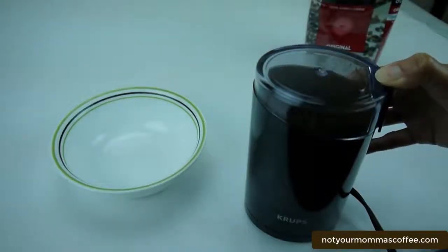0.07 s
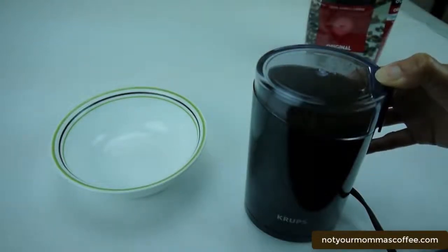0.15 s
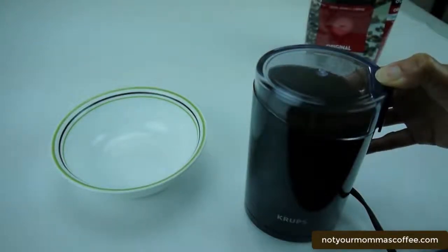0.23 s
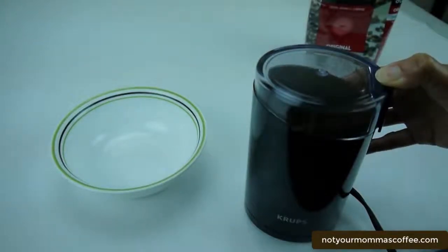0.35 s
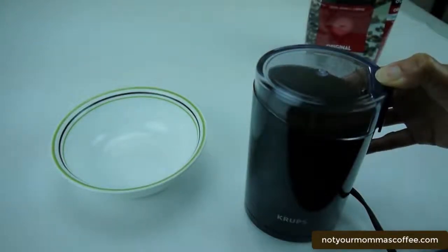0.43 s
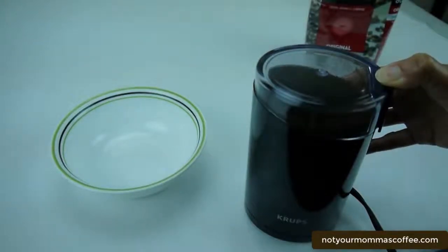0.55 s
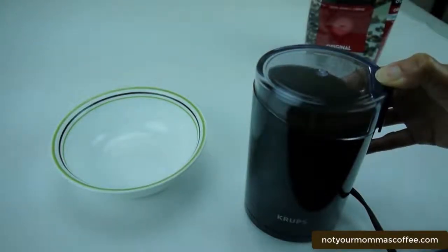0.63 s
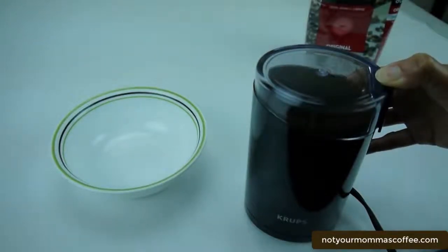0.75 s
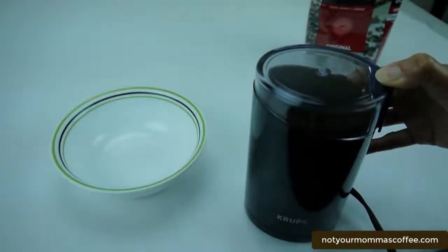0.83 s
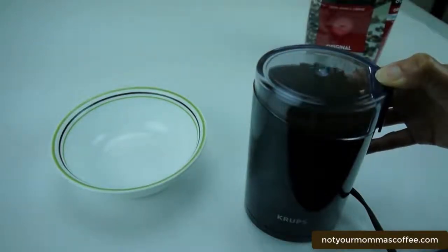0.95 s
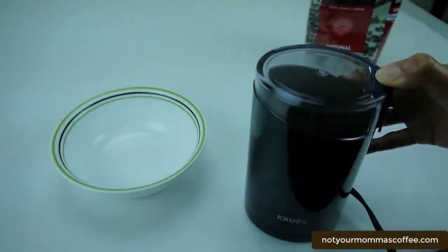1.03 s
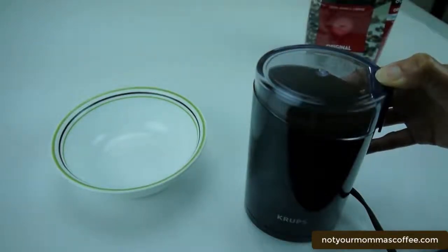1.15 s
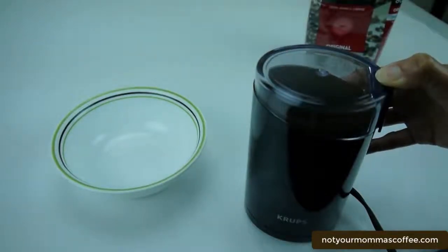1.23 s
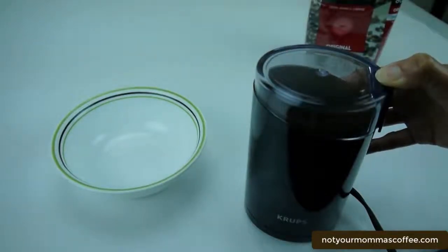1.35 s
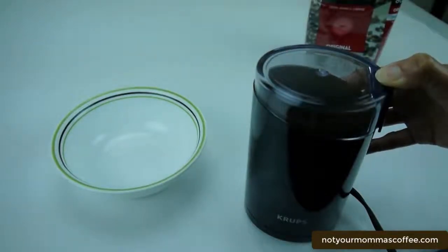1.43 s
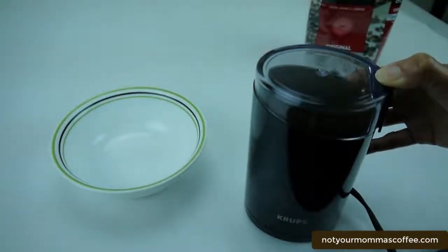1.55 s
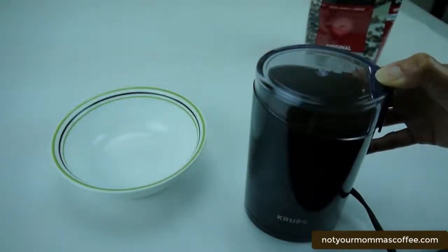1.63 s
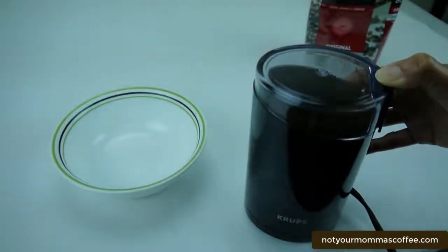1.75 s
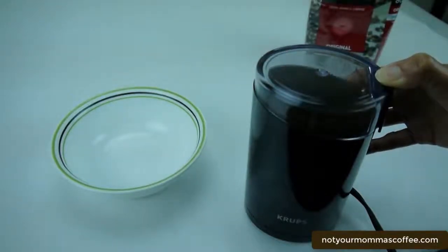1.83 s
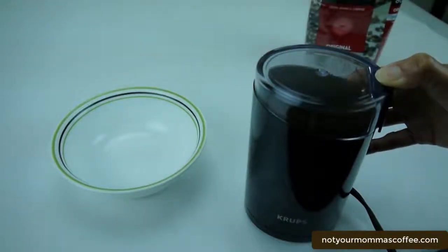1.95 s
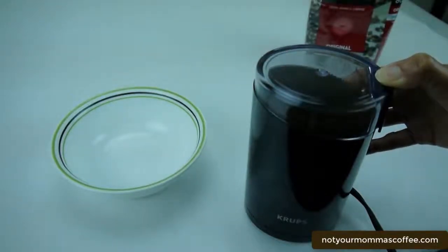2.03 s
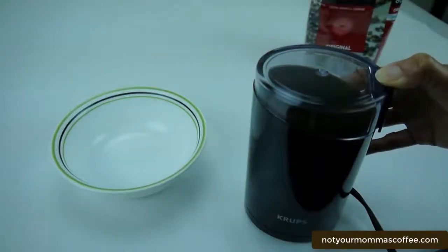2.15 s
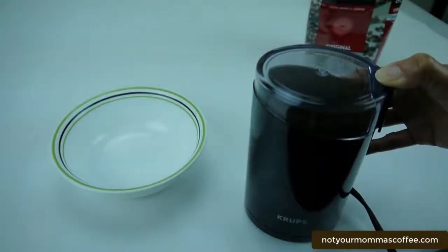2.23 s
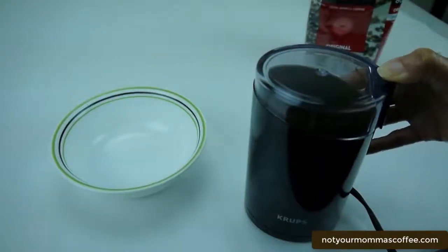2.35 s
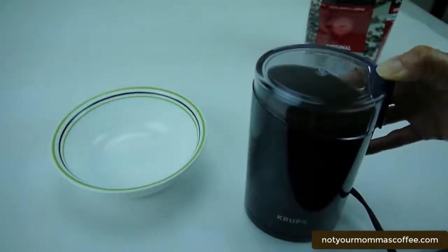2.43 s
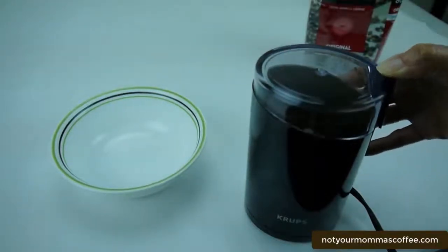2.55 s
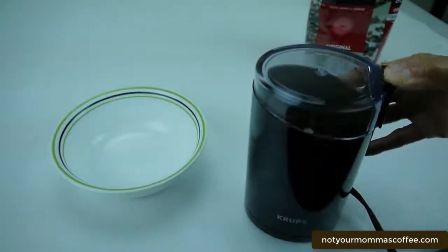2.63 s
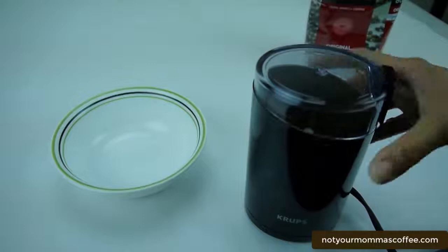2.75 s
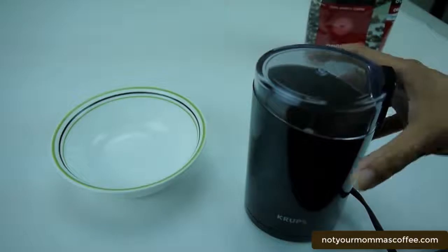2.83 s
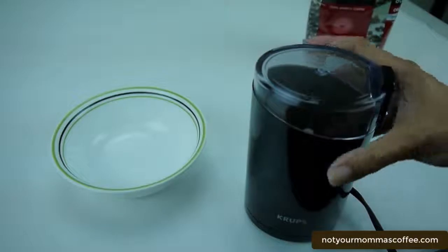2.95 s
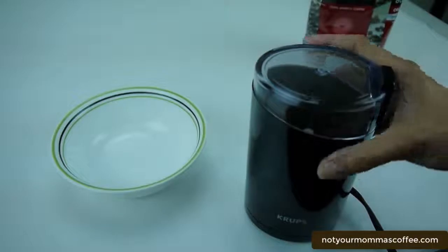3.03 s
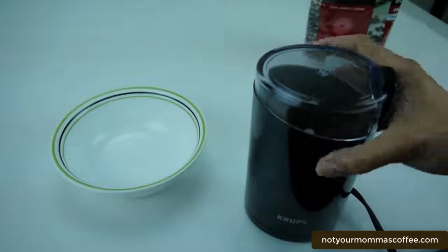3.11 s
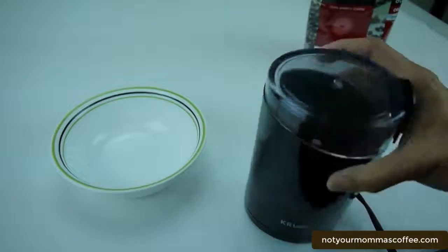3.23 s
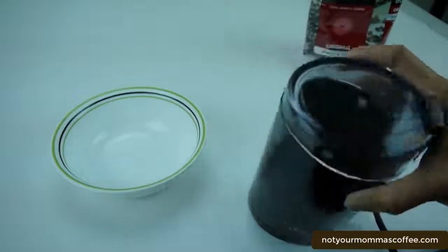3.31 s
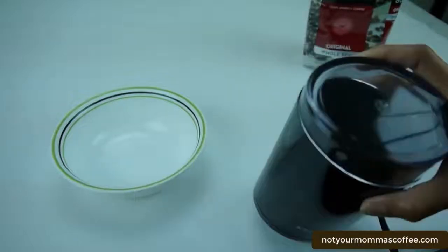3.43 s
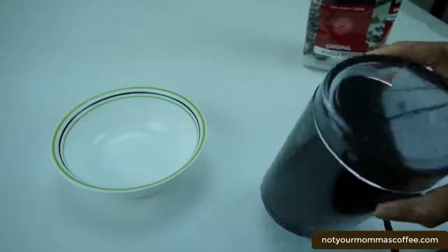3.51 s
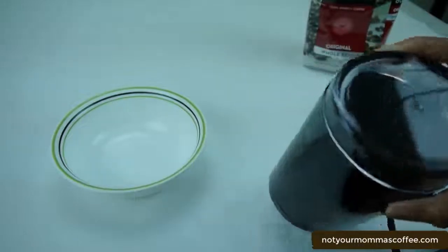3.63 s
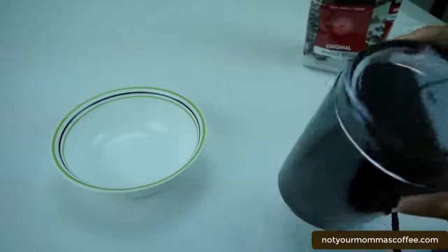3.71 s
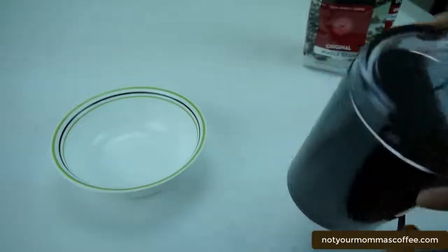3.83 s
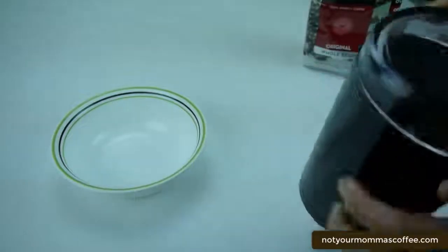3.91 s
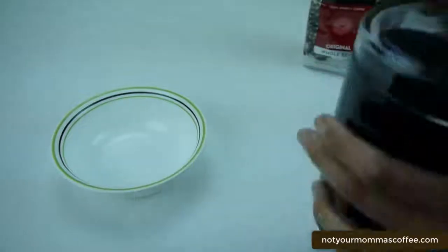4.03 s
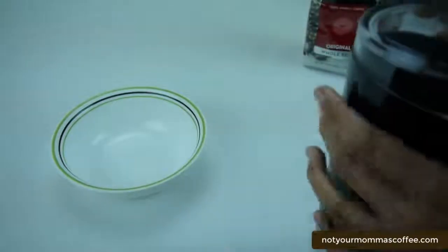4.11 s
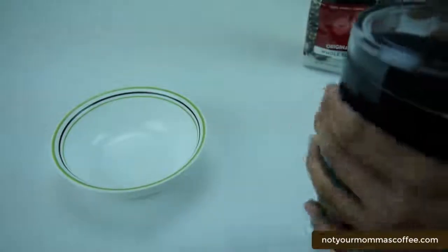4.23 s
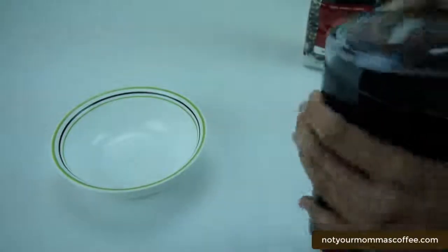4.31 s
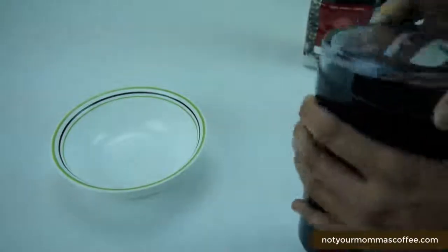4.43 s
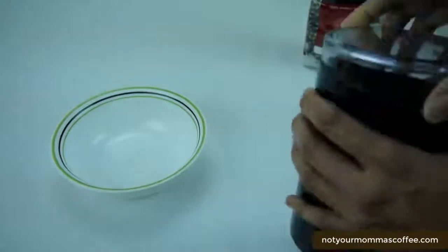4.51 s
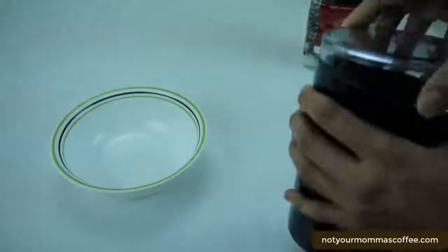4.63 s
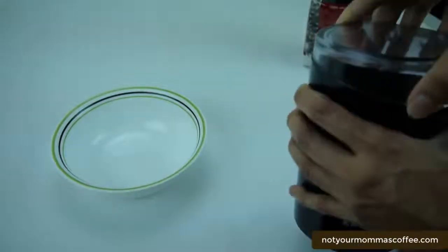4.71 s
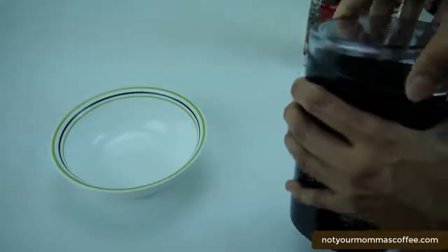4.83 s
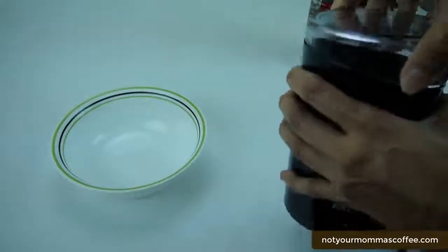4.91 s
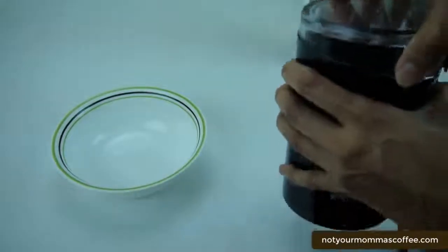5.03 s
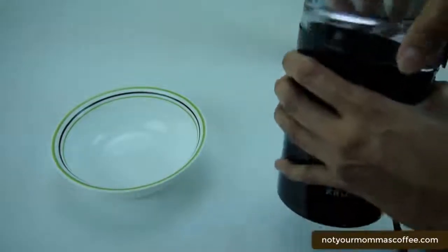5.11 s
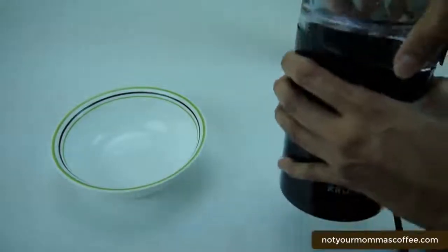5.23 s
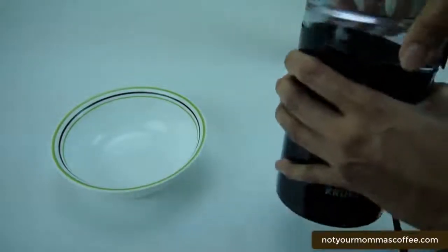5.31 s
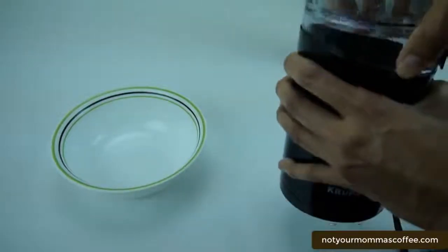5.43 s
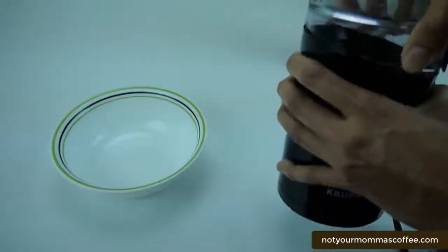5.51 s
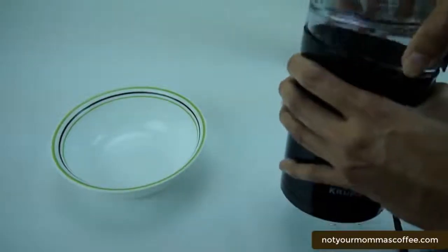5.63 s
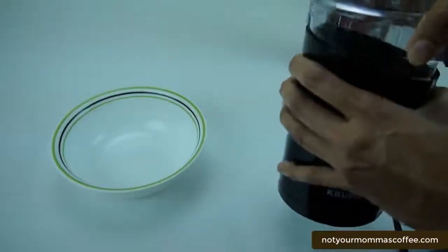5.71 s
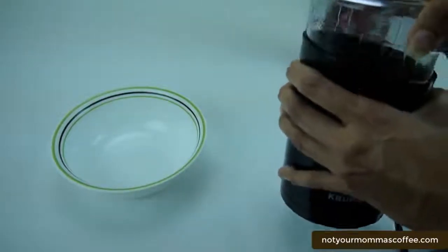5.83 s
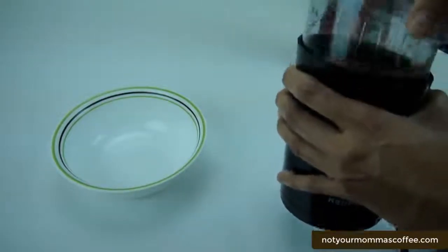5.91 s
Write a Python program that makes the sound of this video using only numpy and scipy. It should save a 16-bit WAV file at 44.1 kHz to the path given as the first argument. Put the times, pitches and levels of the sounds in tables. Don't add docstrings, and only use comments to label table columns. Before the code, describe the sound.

From 0 to 2.8 s a small electric blade grinder runs close by at full speed. A bright, sandy hiss of fine grounds blasting the cup dominates, softening very slightly, over a buzzing motor with steady whine around 3 kHz, a lower tone near 390 Hz and faint hum. Irregular hard cracks of bean chips pepper it several times a second. At about 2.8 s the button is released: the electrical whine cuts, the rotor tone glides down and the hiss dulls and fades, with a few last rattles, until it settles near 3.4 s. Then quiet room noise remains. Light taps come at 3.5 to 3.8 s and a soft bump at 4.3 s. From 4.6 to 5.95 s hands work the plastic lid: dense hollow clicks, a stronger knock near 5.0 s, finger thumps, short rubbing strokes and thin dry skin squeaks of hiss, in a small kitchen with slight reverberation.

```python
import sys
import numpy as np
from scipy import signal
from scipy.fft import rfft, irfft, next_fast_len
from scipy.io import wavfile
from scipy.ndimage import uniform_filter1d

SR = 44100
rng = np.random.default_rng(int(sys.argv[2]) if len(sys.argv) > 2 else 0)


def store_pcm(level_fs):
    pcm = np.round(np.clip(level_fs, -1, 1) * 32767).astype(np.int16)
    wavfile.write(sys.argv[1], SR, np.atleast_2d(pcm).T)


def voltage_ratio(decibels):
    exponent = np.asarray(decibels, float) / 20
    return 10 ** exponent


N = 262836

MAINS_HZ = 120
HUM_DB, WHINE_DB = -48, -5
POWER_OFF_S, FIELD_FADE_S, FIELD_BEND = 2.8, 0.1, 2
HUM_SHARE = 0.4
RELEASE_S, COAST_S = 2.833, 0.6
UNBALANCE_FADE_DB_PER_S = -130
BRUSH_ORDER = 8
SHAFT_ORDERS = [1.99, 3, 5.01, 8, 9, 11.05, 23, 24.05]
# level_db, lower_sideband_db, upper_sideband_db, wander_db
WHINE = [(-50, -28.5, -9.5, 6), (-55, -28.5, 0.5, 7), (-43.5, -21.5, -23, 11.5), (-37, -11, -32, 1.5),
         (-45, -22, -7.5, 9), (-52.5, -19.5, -16.5, 12.5), (-48.5, -10, -8.5, 4), (-46, -11, -10, 6)]
# lower_db, upper_db
UNBALANCE_SIDEBANDS = (-53, -16.5)
# time_s, tone_db
UNBALANCE = [(0, -40.5), (.14, -48), (.22, -40.5), (.63, -48), (.84, -40.5), (1.06, -40), (1.38, -44),
             (2.2, -40), (2.84, -44)]
# pitch_hz, width_hz, gain_db
CRITICAL_SPEEDS = [(367.5, 7.5, 13.5), (325, 16, 17)]
# time_s, pitch_hz
COMMUTATOR = [
    (0, 3096),
    (.5, 3094),
    (.9, 3100),
    (1.6, 3099),
    (2.0, 3106),
    (2.4, 3112),
    (2.8, 3102),
]
# time_s, level_db
BRUSH = [(0.0, -46), (0.03, -41), (0.71, -52.5), (0.72, -43.5), (1.31, -46.5), (1.5, -41), (1.69, -48),
         (1.73, -45), (2.8, -42.5)]

BLAST_DB, DULL_DB, DUST_DB = -28.5, -51, -38.5
BLAST_DB_PER_S, DUST_DB_PER_S = -0.5, -1.26
BLAST_POWER, DULL_POWER, DUST_POWER = 1, 0.68, 2.37
TOP_POWER, TOP_EDGE_HZ = 0.093, 8800
SLIDE_S, SLIDE_DB = 0.2, 3.5
REST_SPEED, SETTLE_DB_PER_S = 0.023, -98
PATCHY_DB = 5
SWIRL_HZ, SWIRL_SINK_HZ, SWIRL_BEND = 4834, 540, 1
SWIRL_STEADY = 0.5
ROCK_BEND = 1.8
# pitch_hz, density_db_per_hz
BLAST = [(1450, -16.5), (1650, -14.5), (1950, -1), (2400, -4.5), (3300, -5.5), (4700, -4), (5600, -5),
         (7000, -2.5), (8000, -1.5), (9700, -5), (11500, -7.5), (12300, -27.5)]
# pitch_hz, density_db_per_hz
DULL = [(170, -0.5), (235, -61.5), (330, 8.5), (480, -2.5), (610, -9.5), (760, -2), (890, 4.5),
        (1020, -4.5), (1220, -3.5), (1450, -28.5), (1600, -31.5)]
# pitch_hz, density_db_per_hz
SLIDING = [(180, -47), (280, 6), (600, -1.5), (830, 2.5), (1200, -5), (1600, -16.5), (1800, -22)]
# pitch_hz, density_db_per_hz
DUST = [(11000, -29.5), (11800, -12.5), (12400, -1.5), (12850, -6), (13400, 2.5), (13850, -0.5),
        (14100, -6), (14400, 0.5), (14600, -43)]
# pitch_hz, width_hz, level_db, coasting_change_db
CUP = [(2014, 36, -17, 11.5), (1996, 300, -15.5, -15.5), (2193, 190, -39.5, -15), (3500, 60, -25.5, 6),
       (6320, 34, -20, -6), (7930, 140, -6, -12.5), (7968, 210, -4.5, -15), (10590, 120, -10.5, -10),
       (10050, 200, -31.5, 25.5), (9390, 36, -13, -8.5), (7700, 70, -24.5, -12.5), (8500, 88, -20.5, -0.5),
       (6750, 58, -26.5, 5)]
DULL_EDGES = [0, 300, 440, 530, 710, 950, 1100, 1350, 1560, 23000]
# peak_s, level_db, fall_s
WOBBLE = [
    (2.7, -55.5, 0.43),
    (3.16, -56.5, 0.34),
    (3.34, -75, 0.11),
]

CUP_KNOCK_DB, CRACK_EDGE_DB = -21.5, 1
# start_s, peak_db, swirl_ring_db
CRACKS = [(0.0634, -9, 0.5), (0.101, -17, -6.5), (0.197, -11, -5), (0.35, -13, 0), (0.3727, -10, 3.5),
          (0.393, -13.5, -5), (0.4145, -8, -2), (0.424, -19, -4), (0.4395, -16, -11.5), (0.55, -13, -8),
          (0.631, -9.5, -7), (0.642, -12.5, -13), (0.8395, -13.5, 2), (0.876, -10, -2.5), (0.9116, -10, 0),
          (0.9854, -15.5, -12.5), (1.04, -14, 0), (1.049, -9.5, -6.5), (1.082, -12, -2.5),
          (1.1092, -17, -0.5), (1.1322, -12.5, -1.5), (1.2477, -13.5, -4.5), (1.2702, -7, -9.5),
          (1.3005, -15, -4), (1.361, -16.5, -5.5), (1.384, -14, -3.5), (1.4102, -4, -0.5),
          (1.4812, -8.5, -10.5), (1.5215, -10, -2.5), (1.5374, -15.5, 5.5), (1.6087, -15, -14),
          (1.6704, -8.5, -12), (1.699, -14.5, -6), (1.734, -12, -11), (1.8552, -17, 3), (1.871, -6, -3),
          (1.9097, -13, -9.5), (2.1254, -6, -4.5), (2.2668, -14, 1), (2.2804, -8.5, -7.5), (2.379, -12, -7),
          (2.4213, -11, 4), (2.5096, -19, 7.5), (2.6192, -10.5, 0.5), (2.7164, -28, -12),
          (2.7364, -26, 0.5), (2.7716, -13, -3.5), (2.792, -16.5, 3), (2.8085, -14, 3), (2.949, -20, -26),
          (2.9761, -13.5, 3), (3.0126, -21, -9), (3.036, -22.5, 8), (3.0948, -13, 4), (3.183, -19, 2),
          (3.222, -22, -2), (3.256, -25, 2), (3.3498, -38, -7)]
# pitch_hz, width_hz, level_db
CHIP = [(7000, 350, -5), (8010, 330, 4.5), (9300, 2800, -3), (8610, 2300, -11), (6350, 400, -11),
        (3860, 130, -10)]

RUSTLE_RISE_S, RUSTLE_FALL_S, RUSTLE_BED_DB = 0.017, 0.051, -81.5
SINGING_RISE_S, SINGING_Q = 0.017, 37
# start_s, peak_db, upper_mode_hz, brightness_db
TICKS = [(3.4575, -51.5, 3370, 16), (3.459, -65, 6030, 28), (3.4874, -55, 3520, 16),
         (3.6137, -60, 2820, -17.5), (3.6424, -72.5, 10130, 32), (3.635, -78, 8000, 24),
         (3.7738, -53, 3220, 7), (4.2931, -64, 3020, -11), (4.594, -51, 3380, 11), (4.612, -61, 3400, 7),
         (4.6668, -53, 6700, 11), (4.7107, -51, 6800, 17), (4.7636, -64, 6000, 27),
         (4.7673, -47, 7200, 24.5), (4.7825, -41.5, 3300, 11), (4.768, -52, 3260, 18),
         (4.9292, -59, 2720, 6), (4.9726, -49, 3170, -3), (5.0055, -50, 3460, 0), (5.0205, -50, 2950, 5.5),
         (5.0679, -55, 5680, -13), (5.2164, -66.5, 4940, 24), (5.2415, -56, 2300, 0),
         (4.937, -62, 2720, 11), (5.035, -56, 2250, 0), (5.2875, -62, 3300, 11), (5.931, -60, 4650, 20),
         (5.3068, -52, 7300, 13), (5.3522, -49.5, 2900, 2), (5.3908, -52, 3500, -8),
         (5.4232, -62, 3500, -2), (5.46, -49, 3460, -4), (5.482, -66, 4500, -6), (5.518, -59, 4500, -4),
         (5.5558, -40, 3780, -32), (5.6136, -48.5, 5970, 5), (5.5859, -53, 3800, -8),
         (5.6831, -58, 3000, -1), (5.845, -50, 3800, 0), (5.912, -60, 3900, -9), (5.7034, -53, 7360, -14),
         (5.7902, -43, 3770, -30), (5.8122, -51, 3850, -7), (5.898, -53, 3910, -8),
         (5.9254, -58.5, 4700, 24.5)]
# start_s, knock_db, knock_hz, rustle_db
KNOCKS = [(3.4575, -57, 377, -79), (3.7738, -66, 310, -75), (4.2914, -51, 303.6, -73.5),
          (4.512, -73.5, 400.5, -68.5), (4.592, -63, 568, -64.5), (4.668, -68, 315, -64),
          (4.7673, -59, 410, -60.5), (4.9888, -28, 1350, -58.5), (5.011, -53, 494, -89),
          (5.2395, -46, 364, -64), (5.352, -43, 532, -64), (5.422, -47, 410, -62), (5.459, -41, 403, -66),
          (5.568, -57.5, 540, -65), (5.618, -52, 338, -64), (5.6836, -36.5, 486, -60.5),
          (5.7039, -58, 359, -67), (5.8084, -38, 412, -57), (5.8354, -40, 351, -72),
          (5.888, -44, 533, -58.5), (5.9316, -51, 310, -84), (5.955, -66, 400, -60)]
# peak_s, hiss_db, rise_s, fall_s
STROKES = [(3.46, -56, 0.03, 0.081), (3.6, -73, .15, 0.3), (3.77, -67, 0.012, 0.084),
           (4.57, -78, 0.41, 0.055), (4.598, -56, .005, 0.073), (4.67, -69, .02, 0.055),
           (4.712, -60.5, 0.011, 0.074), (4.769, -46.5, 0.012, 0.028), (4.8, -60, 0.039, 0.18),
           (4.95, -81, .15, .1), (5.02, -58.5, 0.088, 0.093), (5.24, -60.5, 0.074, 0.088),
           (5.28, -63, 0.057, 0.07), (5.358, -63, 0.041, 0.051), (5.465, -54.5, 0.067, 0.13),
           (5.54, -69, 0.11, 0.12), (5.62, -64, 0.093, .07), (5.695, -61, 0.054, 0.16),
           (5.8, -71.5, .05, 0.064), (5.836, -60, 0.046, 0.034), (5.925, -61.5, .06, 0.15)]
# pitch_hz, density_db_per_hz
RUB_HISS = [(880, -12.5), (1500, -1), (2110, -17), (2460, -0.5), (3400, -5.5), (5140, -4.5), (7430, -3.5),
            (11800, -15), (12800, -35)]
RUB_EDGES = [0, 1800, 2500, 3100, 3800, 5000, 6500, 8500, 10500, 23000]
# pitch_hz, width_hz, level_db
LID = [(2010, 90, -5), (2190, 55, -7.5), (3380, 140, -22), (3500, 1200, -5), (4500, 400, -42),
       (5870, 830, -13.5), (7300, 360, -15)]
# peak_s, level_db, pitch_hz, fall_s
SINGING = [(4.597, -62, 3370, .1), (4.6, -56, 2010, .06), (4.715, -62, 2030, .07),
           (4.785, -57.5, 3300, .06), (4.79, -60, 2220, 0.089), (4.935, -64, 2000, 0.067),
           (4.935, -62, 2660, 0.032), (5.025, -63, 2030, 0.073), (5.07, -62.5, 2020, 0.064),
           (5.27, -63, 4400, .08), (5.5, -63, 3350, .08), (5.8, -62, 2030, 0.087), (5.835, -63, 4800, .04),
           (5.9, -60, 2040, .05), (5.93, -64, 4650, .06)]
# peak_s, level_db, rise_s, fall_s
SLIPS = [
    (3.645, -72, .02, .04),
    (4.77, -70, .02, .04),
    (5.02, -74, .03, 0.045),
    (5.28, -65, .06, 0.077),
    (5.47, -66, .07, .1),
    (5.53, -70, .04, .05),
]
# pitch_hz, density_db_per_hz
SLIP_HISS = [(6000, -12), (9000, 5), (12000, -6), (14400, -8)]

KITCHEN_T60_S, WALL_CUT_HZ = 0.37, 8000
TONES_TO_ROOM_DB, TONES_UNEVEN_DB = -5, -13.5
FLOOR_DB = -62.5
LOUD_DB, GATE_JITTER_DB = -42, 5.5
APART_BELOW_HZ, APART_SPREADS, APART_SHARED = 1500, 0.45, 0.45
# pitch_hz, level_db
ROOM_COLOUR = [(60, -11), (300, -27), (600, -25), (1300, -10.5), (2500, -24.5), (8000, -13), (13000, -5.5)]
# pitch_hz, density_db_per_hz
FLOOR = [(12, -23), (20, -20.5), (33, -25.5), (96, -15), (141, -25), (277, -33), (476, -35.5), (576, -41),
         (990, -45), (1410, -46), (3000, -56.5), (5770, -61), (8000, -52.5), (11000, -52), (13000, -65.5)]
# pitch_hz, threshold_db
GATE_THRESHOLD = [(150, -30), (240, -17), (400, -21.5), (600, -17), (1000, -15.5), (1450, -17.5), (1800, -20.5),
                  (6000, -16), (11000, -14), (12700, -14), (13400, -13), (14300, -6)]
# pitch_hz, threshold_db
QUIET_THRESHOLD = [(1200, -25), (2200, -5), (3500, -6), (5500, -8), (8000, -9), (10500, -6), (12200, -1),
                   (14300, 2)]
# pitch_hz, level_db
APART = [(60, -24), (250, -24), (600, -9), (1200, -12), (2500, -11), (5000, -10), (9000, -12), (13000, -2)]
# low_hz, high_hz, start_s, end_s
BASS_DROP = (105, 210, 2.955, 3.11)
# time_s, level
OFFSET = [
    (0, 0.0039),
    (5.6, 0.0065),
    (5.96, 0.0062),
]


def motor():
    shaft_hz = in_time(COMMUTATOR)[0] / 8 * speed()
    tone_db, = in_time(UNBALANCE)
    brush_db, = in_time(BRUSH)
    field_db = -20 * (np.maximum(clock() - POWER_OFF_S, 0) / FIELD_FADE_S) ** FIELD_BEND
    hum_db = HUM_DB + HUM_SHARE * field_db
    whine_db = WHINE_DB + field_db
    turn = 2 * np.pi * np.cumsum(shaft_hz + 0.6 * drift(9)) / SR
    mains = 2 * np.pi * MAINS_HZ * clock()
    coast_db = UNBALANCE_FADE_DB_PER_S * np.maximum(clock() - RELEASE_S, 0)
    for hz, width, gain_db in CRITICAL_SPEEDS:
        coast_db += gain_db * np.exp(-((shaft_hz - hz) / width) ** 2) * (speed() < 1)

    lower, upper = voltage_ratio(np.array(UNBALANCE_SIDEBANDS))
    out = voltage_ratio(tone_db + coast_db + drift(17)) * np.sin(turn)
    sidebands = lower * np.sin(turn - mains) + upper * np.sin(turn + mains)
    out += voltage_ratio(tone_db + whine_db + np.clip(8 * drift(12), -25, 5)) * sidebands
    out += voltage_ratio(hum_db + 1.7 * drift(15)) * np.sin(mains + 0.58 * drift(8.1))
    for order, (db, lower_db, upper_db, wander_db) in zip(SHAFT_ORDERS, WHINE):
        if order == BRUSH_ORDER:
            db = db + 0.64 * (brush_db - np.mean(np.array(BRUSH)[:, 1]))
        angle = order * turn + 0.17 * wander_db * drift(15)
        lines = np.sin(angle) + voltage_ratio(lower_db) * np.sin(angle - mains) + voltage_ratio(upper_db) * np.sin(angle + mains)
        out += voltage_ratio(db + whine_db + wander_db * np.clip(drift(22), -3, 1)) * lines
    return np.sqrt(2) * out


def grounds():
    speed_db = 20 * np.log10(np.maximum(speed(), REST_SPEED))
    coasting = np.clip((clock() - RELEASE_S) / SLIDE_S, 0, 1)
    blast_db = BLAST_DB + BLAST_DB_PER_S * clock() + BLAST_POWER * speed_db + coasting
    dull_db = DULL_DB + SLIDE_DB * coasting + DULL_POWER * speed_db
    dust_db = DUST_DB + DUST_DB_PER_S * clock() + DUST_POWER * speed_db
    end_db = SETTLE_DB_PER_S * np.maximum(clock() - RELEASE_S - COAST_S, 0)

    sand = grit(4000, spread_db=3, smooth_db=4)
    sand = sand * voltage_ratio(0.7 * drift(25) + 0.28 * drift(100) + 0.89 * drift(23))
    walls = np.zeros(N)
    for k, (hz, width, db, change_db) in enumerate(CUP):
        walls += voltage_ratio(db + change_db * coasting) * (-1) ** k * rms_one(resonance(sand, hz, width))
    swirl = rms_one(swirled(sand, width=60))
    flicker = np.sqrt(uniform_filter1d((swirl / (1e-9 + swirl.std())) ** 2, size=400))
    swirl = rms_one(swirl / (flicker + 0.1) ** SWIRL_STEADY)
    swirl_gain = voltage_ratio(-8 + 3 * coasting + 1.1 * drift(40))

    rumble = rng.standard_normal(N)
    dull = (1 - coasting) * colour(rumble, DULL) + coasting * voltage_ratio(3.5) * colour(rumble, SLIDING)
    bright = voltage_ratio(0.5) * colour(sand, BLAST) + above(walls + swirl_gain * swirl, 1380)
    body, top = bands(bright, [0, TOP_EDGE_HZ, SR])
    bright = body + voltage_ratio(TOP_POWER * speed_db) * top
    rock = resonance(resonance(rng.standard_normal(N), 160, 150), 160, 150)
    out = voltage_ratio(blast_db) * bright + voltage_ratio(dull_db) * dull + voltage_ratio(dust_db) * colour(sand, DUST)
    *low, high = bands(out, DULL_EDGES)
    patchy_db = PATCHY_DB * (1 - 0.6 * coasting)
    out = high + sum(part * voltage_ratio(patchy_db * np.clip(drift(7), -3, 0.7)) for part in low)
    rocking = swells([(s, db, 0.04, fall) for s, db, fall in WOBBLE], bend=ROCK_BEND)
    return voltage_ratio(end_db) * out + rocking * rms_one(rock)


def cracks():
    s, db, swirl_db = np.transpose(CRACKS)
    knock_db = CUP_KNOCK_DB + 4.8 * rng.standard_normal(len(s))
    hit = burst(s, voltage_ratio(db + CRACK_EDGE_DB), 0.0007)
    hit += burst(s, voltage_ratio(db + 4.5), 0.0018)
    hit += burst(s + 0.0027, voltage_ratio(db - 8.5), 0.017)
    bright = swirled(burst(s, voltage_ratio(db + swirl_db + 3), 0.0039), width=350)
    for k, (hz, width, level_db) in enumerate(CHIP):
        bright += voltage_ratio(level_db) * (-1) ** k * resonance(hit, hz, width)
    bright = signal.sosfilt(signal.butter(4, 11500, fs=SR, output="sos"), bright)
    knock = resonance(burst(s + 0.00058, voltage_ratio(db + knock_db + 6.5), 0.016), 1800, 410)
    return above(bright + knock, 1650)


def ticks():
    size = 2000
    s, db, _, bright_db = np.transpose(TICKS)
    snap = burst(s, voltage_ratio(db + bright_db - 12), 0.002)
    out = np.append(resonance(resonance(snap, 4700, 5800), 4900, 5600), np.zeros(size))
    cup = mode(size, hz=2070, width=91) + voltage_ratio(-9) * mode(size, hz=2015, width=45)
    for t, db, upper_hz, bright_db in TICKS:
        upper = voltage_ratio(bright_db - 6) * mode(size, hz=upper_hz, width=upper_hz / 20)
        start = round(t * SR)
        out[start:start + size] += voltage_ratio(db) * (cup + upper)
    for t, db, knock_hz, _ in KNOCKS:
        start = round(t * SR)
        out[start:start + size] += voltage_ratio(db) * mode(size, hz=knock_hz, width=max(400, 0.6 * knock_hz))
    return signal.sosfilt(signal.butter(2, 12000, fs=SR, output="sos"), out[:N])


def rubbing():
    sand = grit(500, spread_db=6.5, smooth_db=10.5) * voltage_ratio(2 * drift(40))
    hiss = colour(sand, RUB_HISS)
    for hz, width, db in LID:
        hiss += voltage_ratio(db + 2.7 * drift(5.1)) * rms_one(resonance(sand, hz, width))
    hiss = sum(part * voltage_ratio(2.2 * drift(10)) for part in bands(hiss, RUB_EDGES))
    rustle = rms_one(resonance(grit(300, spread_db=3, smooth_db=3), 450, 500))
    touches = [(s + 0.0021, db, RUSTLE_RISE_S, RUSTLE_FALL_S) for s, *_, db in KNOCKS]
    low = swells(touches) + voltage_ratio(RUSTLE_BED_DB)
    return voltage_ratio(-6.5) * swells(STROKES) * hiss + low * rustle


def singing():
    chatter = grit(900, spread_db=3, smooth_db=0)
    out = np.zeros(N)
    for s, db, hz, fall in SINGING:
        out += swells([(s, db, SINGING_RISE_S, fall)]) * rms_one(resonance(chatter, hz, hz / SINGING_Q))
    return out


def slips():
    return swells(SLIPS) * colour(grit(1500, spread_db=3, smooth_db=0), SLIP_HISS)


def kitchen(x):
    size = next_fast_len(N + SR)
    hz = np.fft.rfftfreq(size, 1 / SR)
    wall = 1 / (1 + 1j * hz / WALL_CUT_HZ)
    answer = np.zeros((2, len(hz)), complex)
    for k, lag in enumerate(rng.uniform(0.006, 0.03, 16)):
        loop = voltage_ratio(-60 * lag / KITCHEN_T60_S) * wall * np.exp(-2j * np.pi * hz * lag)
        answer[k % 2] += (-1) ** (k // 2) * loop / (1 - loop)
    return irfft(answer * voltage_ratio(at_hz(ROOM_COLOUR, hz)) * rfft(x, size), size)[:, :N]


def room_floor():
    mid, side = (colour(rng.standard_normal(N), FLOOR) for _ in range(2))
    side = signal.lfilter([1, -1], [1, -0.6], side)
    return voltage_ratio(FLOOR_DB) * (mid + voltage_ratio(-5) * side * [[1], [-1]])


def gated(x):
    parts = [(x[0] + x[1]) / 2, (x[0] - x[1]) / 2, rng.standard_normal(N)]
    hz, s, (mid, side, error) = signal.stft(parts, SR, nperseg=2048, noverlap=1536)
    curve = lambda rows: at_hz(rows, hz)[:, None]
    power = uniform_filter1d(uniform_filter1d(abs(mid) ** 2, size=4, axis=0), size=3, axis=1)
    treble = power[(hz > 1500) & (hz < 15000)].mean(axis=0)
    jitter = rng.standard_normal((len(hz) // 6 + 1, len(s) // 3 + 1))
    jitter = np.repeat(np.repeat(jitter, 6, axis=0), 3, axis=1)[:len(hz), :len(s)]
    loud = np.interp(s, clock(), uniform_filter1d(x[0] ** 2, size=4096)) > voltage_ratio(2 * LOUD_DB)
    treble = np.where(loud, treble, np.percentile(treble, 10))
    threshold_db = np.where(loud, curve(GATE_THRESHOLD), curve(QUIET_THRESHOLD)) + GATE_JITTER_DB * jitter
    kept = power > treble * voltage_ratio(2 * threshold_db)
    low, high, start, end = BASS_DROP
    kept[np.ix_((hz > low) & (hz < high), (s > start) & (s < end))] = False

    band = (8 * np.log2(hz / 300 + 1)).astype(int)
    chance = rng.standard_normal((band[-1] + 2, len(s) // 2 + 2))
    chance = np.repeat(chance[:, 1:] + chance[:, :-1], 2, axis=1)[:, :len(s)] / np.sqrt(2)
    apart = chance[band] + APART_SHARED * chance[-1] > APART_SPREADS
    apart = apart | (hz < APART_BELOW_HZ)[:, None] | ~loud
    local = np.sqrt(uniform_filter1d(power, size=12, axis=0) + 1e-20)
    error = rms_one(error.real) * np.exp(1j * np.angle(error))
    side = side + loud * voltage_ratio(curve(APART)) * local * error
    cells = [mid * kept, side * kept * apart]
    mid, side = signal.istft(cells, SR, nperseg=2048, noverlap=1536)[1][:, :N]
    return np.array([mid + side, mid - side])


def clock():
    return np.arange(N) / SR


def speed():
    return np.clip(1 - (clock() - RELEASE_S) / COAST_S, 0, 1)


def swirled(x, width):
    swirl_hz = SWIRL_HZ - SWIRL_SINK_HZ * (1 - speed()) ** SWIRL_BEND
    slide = np.exp(2j * np.pi * np.cumsum(swirl_hz - 4830) / SR)
    pair = resonance(x, 4830, width) + voltage_ratio(-5) * resonance(x, 4720, 50)
    return np.real(signal.hilbert(pair) * slide)


def grit(per_s, spread_db, smooth_db):
    sizes = voltage_ratio(spread_db * np.minimum(rng.exponential(1, N), 4)) * rng.choice([-1, 1], N)
    clicks = rms_one(sizes * (rng.random(N) < per_s / SR))
    return rms_one(clicks + voltage_ratio(smooth_db) * rng.standard_normal(N))


def burst(times, gains, length_s):
    size = int(6 * length_s * SR) + 20
    age = np.arange(size) / SR
    shape = np.exp(-age / length_s) * (1 - np.exp(-age / 0.000057))
    shape_rms = np.sqrt(np.mean(shape ** 2))
    out = np.zeros(N + size)
    noise = rng.standard_normal((len(times), 1500))
    for s, gain, grain in zip(times, gains, noise):
        start = round(s * SR)
        out[start:start + size] += gain * rms_one(np.resize(grain, size) * shape) * shape_rms
    return out[:N]


def mode(size, hz, width):
    age = np.arange(size) / SR
    return np.sin(2 * np.pi * hz * age) * np.exp(-np.pi * width * age) * (1 - np.exp(-age / 0.00035))


def resonance(x, hz, width):
    r = np.exp(-np.pi * width / SR)
    poles = [1, -2 * r * np.cos(2 * np.pi * hz / SR), r * r]
    return signal.lfilter(np.array([1, 0, -1]) * (1 - r * r) / 2, poles, x + 1e-18)


def swells(rows, bend=1):
    t = clock()
    out = np.zeros(N)
    for s, db, rise, fall in rows:
        spans = np.where(t < s, (s - t) / rise, (t - s) / fall)
        out += voltage_ratio(db - 20 * spans ** bend)
    return out


def drift(rate):
    r = np.exp(-80 * np.pi * rate / SR)
    slow = signal.lfilter([1], [1, -2 * r, r * r], rng.standard_normal(N // 40 + 2002))[2000:]
    return np.interp(np.arange(N) / 40, np.arange(len(slow)), rms_one(slow))


def colour(x, spectrum):
    hz = np.maximum(np.fft.rfftfreq(N, 1 / SR), 1)
    points = np.array(spectrum, float)
    gain = voltage_ratio(np.interp(np.log(hz), np.log(points[:, 0]), points[:, 1], left=-90, right=-90))
    return rms_one(irfft(rfft(x) * gain, N))


def bands(x, edges):
    hz, spectrum = np.fft.rfftfreq(N, 1 / SR), rfft(x)
    return [irfft(spectrum * (hz >= low) * (hz < high), N) for low, high in zip(edges, edges[1:])]


def above(x, hz):
    return signal.sosfilt(signal.butter(6, hz, "high", fs=SR, output="sos"), x + 1e-18)


def at_hz(rows, hz):
    points = np.array(rows)
    return np.interp(np.log(hz + 1), np.log(points[:, 0]), points[:, 1])


def in_time(rows):
    s, *columns = np.transpose(rows)
    return [np.interp(clock(), s, column) for column in columns]


def rms_one(x):
    return x / np.sqrt(np.mean(x ** 2) + 1e-20)


def scene():
    tones = motor()
    near = grounds() + cracks() + ticks() + rubbing() + singing() + slips()
    uneven = voltage_ratio(TONES_UNEVEN_DB) * drift(20) * tones * [[1], [-1]]
    reverberant = kitchen(near + voltage_ratio(TONES_TO_ROOM_DB) * tones)
    return near + tones + reverberant + room_floor() + uneven


def roll_off(x):
    return signal.sosfilt(signal.butter(12, 14940, fs=SR, output="sos"), x)


def record(dry):
    unequal = voltage_ratio(np.array([[-0.15], [0.15]]))
    mix = gated(dry) * unequal + in_time(OFFSET)[0]
    return roll_off(mix)


dry = scene()
out = record(dry)
store_pcm(out)
```